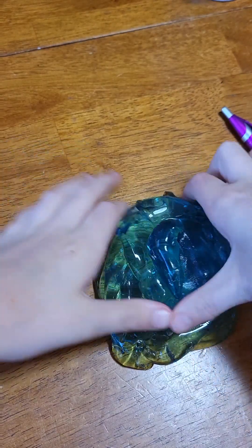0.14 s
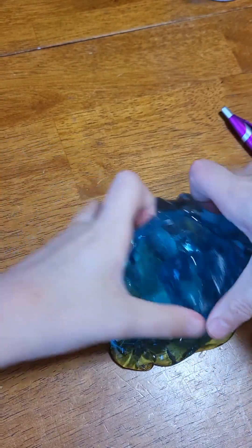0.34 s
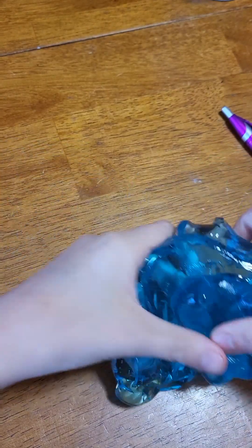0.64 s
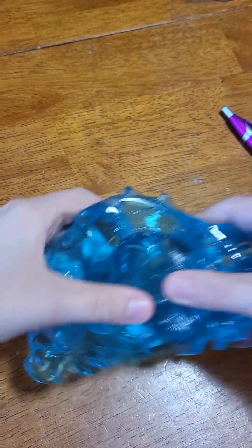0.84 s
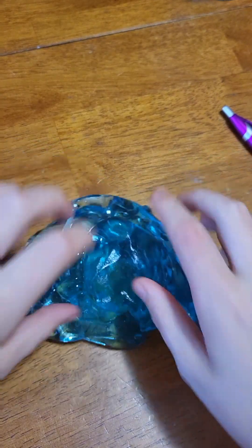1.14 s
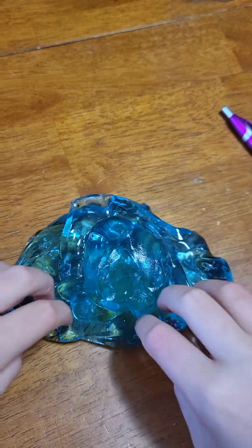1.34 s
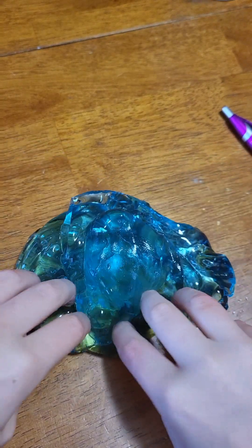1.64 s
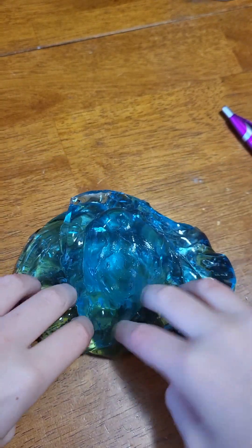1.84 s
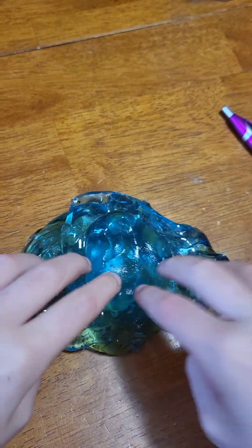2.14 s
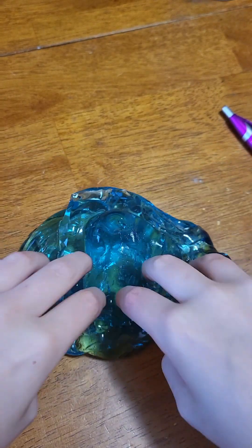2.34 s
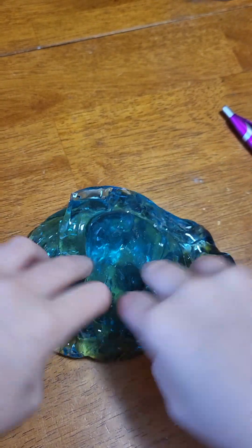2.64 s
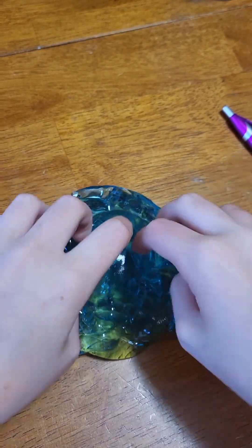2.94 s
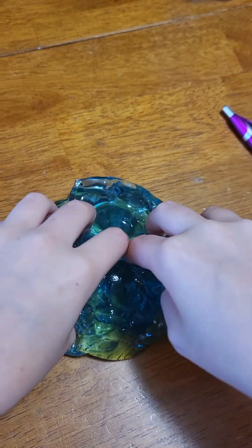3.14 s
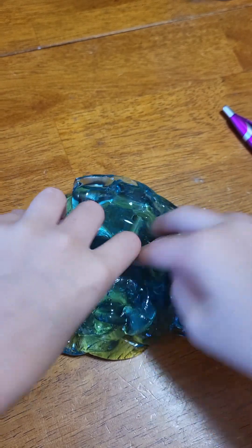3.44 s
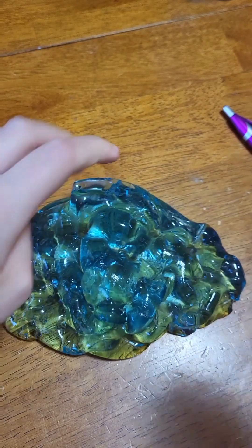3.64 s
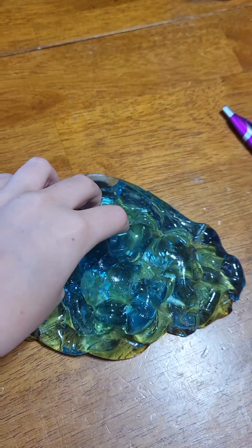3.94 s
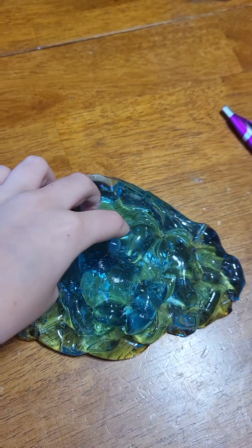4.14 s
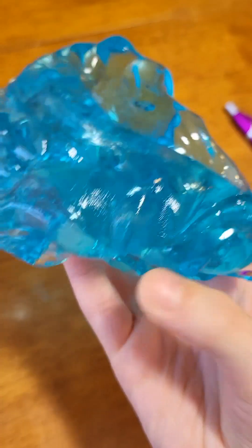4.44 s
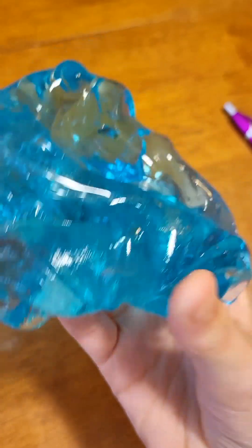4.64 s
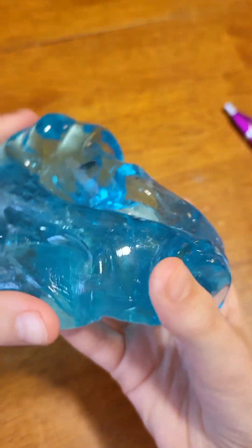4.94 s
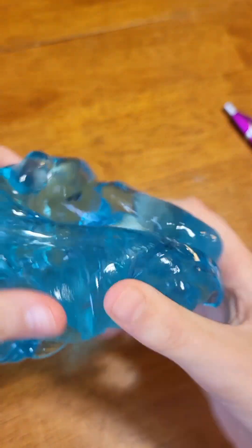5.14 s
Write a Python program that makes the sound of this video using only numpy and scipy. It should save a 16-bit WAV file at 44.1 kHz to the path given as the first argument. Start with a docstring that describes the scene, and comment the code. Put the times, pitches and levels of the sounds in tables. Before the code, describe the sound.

Slime is pressed and poked beside a phone. Tacky peeling and small ticks open, with a soft low landing. After quiet gaps, trapped air bursts in loud, crisp, wet pops, each with a brief ringing room tail, brighter on the left. Soft puffs buffet the right microphone. Near the end comes an abrupt cut, a loud dull tap on the case and a last faint sticky crackle over rumble and hiss.

```python
"""A small, live room with a wooden table: fingers poke a lump of slime close to a phone. Trapped air tears out
in pops, bursts of filtered noise with film and cavity rings, echoed by a noise-built room. Sticky skin and
rubbing hands crackle in swelling grains of noise, and wavering low tones buffet the right microphone as puffs.
Damped notes with noise make the lump's thuds and the knocks on the phone; sine hum, rumble and hiss lie under."""
import sys
import numpy as np
from scipy import signal
from scipy.fft import rfft, irfft
from scipy.io import wavfile
from scipy.ndimage import uniform_filter1d

SR = 44100
rng = np.random.default_rng(int(sys.argv[2]) if len(sys.argv) > 2 else 0)


def wrap_up_sound(samples):
    """Save the sound to the file named by the first command line argument, as 16-bit audio."""
    columns = np.atleast_2d(samples).T
    # keep every value between -1 and 1, then stretch to whole-number steps
    tamed = np.clip(columns, -1, 1)
    steps = np.round(tamed * 32767).astype(np.int16)
    wavfile.write(sys.argv[1], SR, steps)


N = 233756
TIME = np.arange(N) / SR

# relative colour of a rupture in its low, middle and top range: (frequency [Hz], level [dB])
BODY_COLOUR = [(200, -19), (600, -26), (1300, 2), (2400, 9), (3400, 10), (5000, -22.5)]
CRACK_COLOUR = [(2200, -11.5), (3700, 5.5), (5200, 5), (6400, 6.5), (7400, 11.5), (8500, 0.5), (9700, -12),
                (12000, -34)]
SIZZLE_COLOUR = [(7500, -27.5), (9800, -15.5), (11500, -9.5), (13500, -3), (15200, -5), (17000, -12.5)]


def undb(db):
    """Decibels to gain."""
    return 10 ** (np.asarray(db) / 20)


def unit(x):
    """Scale to rms 1."""
    return x / np.sqrt(np.mean(x ** 2) + 1e-20)


def blow(x):
    """Scale to the energy of one millisecond at rms 1, so that short and long bursts compare."""
    return x * np.sqrt(SR / 1000 / (np.sum(x ** 2) + 1e-20))


def on_log(hz, points):
    """Read (Hz, value) points on a log-frequency axis."""
    f, value = np.transpose(points)
    return np.interp(np.log(hz + 1e-3), np.log(f), value)


def colour(x, points):
    """Filter by a (Hz, dB) spectrum, leaving the phases alone."""
    size = x.shape[-1]
    gain = undb(on_log(np.fft.rfftfreq(size, 1 / SR), points))
    return irfft(rfft(x) * gain, size)


def strike(x, points, size=512):
    """Causal minimum-phase filter with a (Hz, dB) spectrum, so that attacks stay sharp."""
    gain = undb(on_log(np.fft.rfftfreq(size, 1 / SR), points))
    # folding the cepstrum onto positive times makes the filter minimum phase
    cepstrum = irfft(np.log(gain))
    cepstrum[1:size // 2] *= 2
    cepstrum[size // 2 + 1:] = 0
    impulse = irfft(np.exp(rfft(cepstrum)))
    return signal.fftconvolve(x, impulse)[:len(x)]


def ring(x, hz, q):
    """One damped resonance."""
    return signal.lfilter(*signal.iirpeak(hz, q, fs=SR), x)


def grains(size, spread_db):
    """Countless tiny ruptures of very unequal strength: noise whose level jumps at every sample."""
    return rng.standard_normal(size) * undb(spread_db * rng.standard_normal(size))


def add(out, s, sound):
    """Mix a sound in at a time."""
    i = int(s * SR)
    out[..., i:i + sound.shape[-1]] += sound[..., :N - i]


def pop(length, body_db, sizzle_db, film_db, size=2048):
    """The film over a pocket tears in a run of ruptures and rings along."""
    t = np.arange(size) / SR
    # the tear opens, runs for its length and dies; the table and hands scatter a little more
    opening = np.minimum(t / (0.0002 + 0.15 * length), 1)
    run = np.exp(-np.maximum(t - length, 0) / .00043)
    scatter = undb(-11) * np.exp(-t / 0.0065)
    tearing = opening * (run + scatter)
    # the slack film goes on crackling as it settles
    crackle = np.clip(unit(grains(size, spread_db=9.5)), -9, 9)
    settling = crackle * opening * np.exp(-t / 0.013)
    tear = unit(grains(size, spread_db=5.5)) * tearing + undb(-11.5) * settling
    ranges = ((BODY_COLOUR, body_db), (CRACK_COLOUR, 0), (SIZZLE_COLOUR, sizzle_db))
    snap = sum(undb(db) * blow(strike(tear, points, size=256)) for points, db in ranges)
    # the taut film rings on the same note in every pop
    film = ring(grains(size, spread_db=7.0) * tearing, hz=7530, q=14)
    return blow(snap + undb(film_db) * blow(film))


def pops(count=2):
    """A ragged tear sends a different wave in each direction: one row per direction."""
    # air pockets bursting, a few to each poke; the last three columns are relative to the crack:
    # (time [s], length [s], strength over 1 ms [dB], body [dB], sizzle [dB], film ring [dB])
    bursts = [(0.33, .002, -33.5, -6.5, 3, 2), (0.353, 0.0036, -23, 3, 23, -15),
              (0.371, 0.002, -26, 0.5, 7.5, -19), (0.425, 0.0033, -33, -9.5, -26, -28),
              (1.9192, 0.0062, -27, 7.5, -2, -19), (1.927, 0.0079, -13, -0.5, 3.5, -1),
              (1.942, 0.019, -21.5, -1, -12, -19), (1.9599, 0.00035, -13.5, -11, 0, -24),
              (1.962, 0.0033, -11.5, 1, 7, -9), (2.709, 0.0068, -17.5, -7, 6.5, -8),
              (2.7208, 0.0031, -13, -3, 4.5, -5.5), (2.738, 0.0022, -19.5, -13, 8.5, -13.5),
              (2.766, 0.00041, -18.5, -9.5, 8, -14.5), (2.7682, 0.0012, -9.5, -5.5, 12.5, -12),
              (2.7695, 0.0052, -14, -2.5, 0.5, 0), (3.499, .0033, -6.5, -10, -0.5, 7.5),
              (3.5727, 0.0054, -12.5, -5, 0, -13), (3.596, 0.009, -21, -28, 8, -10),
              (3.609, 0.0073, -13.5, -35, 1, -16), (4.292, 0.00043, -17.5, -13, 18, 10),
              (4.2939, 0.0052, -18, 0, 9.5, -8), (4.327, 0.0042, -15.5, -16.5, 5.5, 3),
              (4.3389, 0.0088, -8.5, -12, 4.5, 0.5)]
    out = np.zeros((count, N))
    for s, length, db, body_db, sizzle_db, film_db in bursts:
        for direction in out:
            add(direction, s, undb(db) * pop(length, body_db, sizzle_db, film_db))
    return out


def cavities():
    """An opening air cavity grows, so its note sinks a little as it dies."""
    # cavities under the fingertips, ringing as they are squeezed open:
    # (time [s], level before decay [dB], starting pitch [Hz], time to fall 60 dB [s])
    openings = [(0.425, -26, 5750, .004), (1.921, -22, 1650, .009), (1.964, -18.5, 1600, .012),
                (1.966, -29, 850, .016), (2.72, -23, 2400, .01), (2.771, -15.5, 1360, .015),
                (3.503, -25, 1190, .016), (3.576, -18, 2330, .009)]
    out, t = np.zeros(N), np.arange(4096) / SR
    for s, db, hz, t60 in openings:
        pitch = hz * (1 - .08 * (1 - np.exp(-t / .012)))
        swell = np.minimum(t / 0.0011, 1) * undb(db - 60 * t / t60)
        add(out, s, swell * np.sin(2 * np.pi * np.cumsum(pitch) / SR))
    return out


def microphones(waves):
    """The left microphone faces the slime; the right one hears it later and duller, mostly off the table."""
    glancing = strike(waves[1], [(500, -8.0), (2000, -1.5), (4500, -3.5), (8000, -8), (15000, -5.5)])
    # delays in samples
    right = undb(-20) * np.roll(waves[0], 4) + np.roll(glancing, 10)
    return np.array([waves[0], right])


def peeling():
    """Tacky skin pulls at the slime and lets go, and hands rub and rustle: a fine crackle that swells and dies,
    with a few lone ticks."""
    # skin peeling off, and hands rubbing and rustling: (time it lets go [s], build-up [s], relative strength
    # [dB], crackle against sizzle [dB])
    peels = [(0.16, .05, -59.5, -13), (0.28, 0.17, -53, -11.5), (0.36, 0.14, -46.5, -7.5),
             (0.60, 0.33, -62.5, -8.5), (0.88, 0.34, -66, -20), (1.02, 0.36, -63, -6.5),
             (1.10, 0.065, -56.5, -5), (1.16, .1, -79, 4), (1.60, 0.35, -70, 2), (1.7, 0.24, -69, -11),
             (2.405, 0.12, -62, -2), (3.49, 0.15, -58, -9), (5.16, .15, -54, -7), (5.28, 0.38, -73.5, 2)]
    # single sticky ticks: (time [s], strength over 1 ms [dB])
    ticks = [(.137, -51), (0.27, -48.5), (0.318, -41), (0.34, -32.5), (0.833, -56), (1.017, -56),
             (1.032, -49), (1.319, -54.5), (1.578, -53), (3.052, -60), (4.008, -62)]
    # a peel swells by the range as it builds, and loses it again over the release
    range_db, release_s = 37, 0.31
    out, sizzle, crackle = np.zeros((2, N)), 0, 0
    for s, build_s, db, crackle_db in peels:
        away = np.maximum((s - TIME) / build_s, (TIME - s) / release_s)
        pull = undb(db - range_db * away)
        sizzle = np.hypot(sizzle, pull)
        crackle = np.hypot(crackle, undb(crackle_db) * pull)
    # the soft body of the slime sounds along with the crackle
    layers = ((sizzle, -1.5, SIZZLE_COLOUR), (crackle, -0.5, CRACK_COLOUR), (crackle, -5, BODY_COLOUR))
    for level, db, points in layers:
        out += undb(db) * level * unit(colour(grains((2, N), spread_db=7.0), points))
    for s, db in ticks:
        for channel in out:
            add(channel, s, undb(db) * pop(length=0.00051, body_db=-9.5, sizzle_db=1.5, film_db=-10))
    return out


def puffs(size=16384):
    """Each puff is an eddy that shakes the membrane of the right microphone at a wandering rate, holds and dies."""
    # air striking the microphone: (time [s], level [dB], middle of the wandering rate [Hz], hold [s])
    gusts = [(1.97, -19, 74.3, 0.039), (2.732, -18, 63.5, 0.017), (2.768, -9, 107, 0.0046),
             (2.794, -22.5, 82.5, 0.012), (2.834, -19, 91.6, 0.028), (4.35, -30.5, 62.9, 0.048),
             (4.417, -31, 132.4, 0.016)]
    turbulence_colour = [(25, -10), (60, 8), (250, -14.5), (600, -34.5), (1500, -42), (5000, -45.0)]
    attack_s = 0.0016
    out, t = np.zeros(N), np.arange(size) / SR
    for s, db, hz, hold in gusts:
        wander = unit(uniform_filter1d(rng.standard_normal(size), 200))
        phase = 2 * np.pi * np.cumsum(hz * np.exp(0.3 * wander)) / SR
        # the time constant of the release equals the hold
        swell = np.minimum(t / attack_s, 1) * np.exp(-np.maximum(t - hold, 0) / hold)
        # the pressure crests are peaked, the troughs round; a slower push lies under them
        pressure = np.sin(phase) - 0.55 * np.cos(2 * phase) + 0.5 * np.sin(.68 * phase)
        turbulence = unit(colour(rng.standard_normal(size), turbulence_colour))
        eddy = unit(swell * (pressure + undb(-4.0) * turbulence))
        add(out, s, undb(db) * eddy * np.sqrt(np.mean(swell ** 2)))
    # the left microphone catches only a trace
    return np.outer([undb(-25.5), 1], out)


def thuds():
    """Soft weight on wood: a damped low note and a dull slap of resonant noise."""
    # lump and fingers landing: (time [s], relative level before decay [dB], pitch [Hz], time to fall 60 dB [s])
    landings = [(0.344, -33, 255, 0.42), (0.363, -21, 109, 0.14), (0.377, -29.5, 192, 0.06),
                (1.1, -35.5, 122.4, 0.68), (1.964, -30, 254, 0.11), (2.39, -38, 428, 0.24),
                (2.77, -25, 268, 0.11), (3.502, -41, 325, .15)]
    out, t = np.zeros((2, N)), np.arange(8192) / SR
    for s, db, hz, t60 in landings:
        slap_hz = hz * 1.1
        noises = rng.standard_normal((2, len(t)))
        slap = np.array([unit(ring(ring(noise, slap_hz, q=.8), slap_hz, q=.8)) for noise in noises])
        push = np.minimum(t / 0.0019, 1) * undb(db - 60 * t / t60)
        add(out, s, push * (0.47 * np.sin(2 * np.pi * hz * t) + 0.41 * slap))
    return out


def knocks():
    """Taps travel through the phone's case, a damped note and a bright tick, with no room on them."""
    # taps beside the right microphone:
    # (time [s], peak of the case note [dB], pitch [Hz], time to fall 60 dB [s], tick against case [dB])
    taps = [(4.414, -28, 2210, .002, 0), (4.4198, -4.5, 1730, 0.0034, -30),
            (4.4219, -17, 1440, 0.0073, -9.5), (4.492, -33.5, 1400, 0.0061, -18),
            (4.5697, -24, 1480, 0.0035, 0.5)]
    tick_colour = [(1000, -17), (4000, -14), (8000, 11), (14000, 6), (15500, 16), (17000, -27)]
    out, t = np.zeros(N), np.arange(1024) / SR
    for s, db, hz, t60, tick_db in taps:
        attack = np.minimum(t / 0.000227, 1) ** 2
        case = -np.sin(2 * np.pi * hz * t) * attack * undb(-60 * t / t60)
        contact = rng.standard_normal(len(t)) * np.minimum(t / 0.0001, 1) * np.exp(-t / 0.001)
        tick = strike(contact, tick_colour)
        add(out, s, undb(db) * case / np.abs(case).max())
        add(out, s + .0001, undb(db + tick_db) * tick / np.abs(tick).max())
    # the left microphone catches only a trace
    return np.outer([undb(-34), 1], out)


def room(x, size=32768):
    """Hard walls: sparse first reflections thicken into a tail whose top treble dies first."""
    # colour of the room's answer: (frequency [Hz], level [dB])
    answer = [(100, -11.5), (400, 12), (600, -0.5), (830, 3.5), (1300, -0.5), (2500, -4.5), (4500, -6),
              (7400, -8.5), (10000, -6.5), (15000, -3.5)]
    # its decay: (frequency [Hz], time to fall 60 dB [s])
    decay = [(150, 0.61), (1200, 0.42), (3000, 0.37), (7000, 0.49), (11000, 0.16), (15000, 0.1)]
    t, hz = np.arange(size) / SR, np.fft.rfftfreq(size, 1 / SR)
    centres = np.geomspace(250, 16000, 7)
    # share of samples that carry an echo
    density = np.clip((t / 0.048) ** 2, .04, 1)
    echoes = rng.standard_normal((2, size)) * (rng.random((2, size)) < density) / np.sqrt(density)
    # nothing returns in the first 3 ms; the early echoes are stronger
    spectrum = rfft(echoes * (t > .003) * (1 + 1.7 * np.exp(-t / 0.01)))
    tails = 0
    # overlapping bands, each with its own decay
    for centre, share in zip(centres, np.eye(len(centres))):
        band = irfft(spectrum * np.interp(hz, centres, share), size)
        tails = tails + band * np.exp(-np.log(1000) * t / on_log(centre, decay))
    tails = np.array([strike(tail / np.sqrt(np.sum(tail ** 2)), answer) for tail in tails])
    return signal.fftconvolve(x[None], tails, axes=1)[:, :N]


def background():
    """A wavering appliance hum over a rumble that both microphones largely share, and each one's own hiss."""
    # appliance hum: (frequency [Hz], relative level [dB])
    hum_tones = [(59.2, -58.5), (215.3, -51), (452.2, -62.5)]
    # colour of the steady room rumble: (frequency [Hz], relative density [dB per Hz])
    rumble_colour = [(15, -45.5), (25, -11.5), (59, -12), (86, -12.5), (123, -7), (188, -13.5), (220, 1.5),
                     (251, -8), (298, -12.5), (321, -22.5), (461, -20.5), (800, -34), (1040, -67),
                     (1760, -120)]
    # colour of the faint hiss at each microphone: (frequency [Hz], relative density [dB per Hz])
    left_hiss = [(300, -2), (700, 1.5), (1100, 2), (1900, -1), (2400, -11.5), (3200, -17.5), (7600, -21),
                 (8800, -32.5), (11000, -26.5), (13500, -19), (15500, -26.5)]
    right_hiss = [(300, -18.5), (650, 4), (1100, -6), (1600, 0.5), (3050, -4.5), (3600, -19.5), (5500, -23),
                  (7700, -15.5), (8800, -22), (11000, -23.5), (14000, -19.5)]
    waver_colour = [(3, -13.5), (14, -9.5), (40, -23.0), (150, -86.5)]
    noise = rng.standard_normal(N) + 0.25 * rng.standard_normal((2, N))
    rumble = undb(-44.0) * unit(colour(noise, rumble_colour))
    hiss = [undb(db) * unit(colour(rng.standard_normal(N), points))
            for points, db in ((left_hiss, -60.5), (right_hiss, -59.5))]
    hum = 0
    for hz, db in hum_tones:
        waver = unit(colour(rng.standard_normal(N), waver_colour))
        tone = np.sin(2 * np.pi * (hz * TIME + rng.random()))
        hum = hum + undb(db) * (1 + 0.44 * waver) * tone
    # rumble and hum lean to the left
    return (rumble + hum) * undb([[1], [-1]]) + np.array(hiss)


def scene():
    """Slime sounds and their room, with thuds, puffs, knocks and background on top."""
    waves, peel = pops() + cavities(), peeling()
    # each direction finds its own way round the walls
    walls = sum(room(wave + peel[k % 2]) for k, wave in enumerate(waves)) / np.sqrt(len(waves))
    # a cut stops the room tail dead just before the knocks; the room is heard again after them
    cut_from_s, cut_to_s = 4.403, 5.07
    tail_gate = uniform_filter1d(1. * ((TIME < cut_from_s) | (TIME > cut_to_s)), size=64)
    return microphones(waves) + peel + tail_gate * walls + thuds() + puffs() + knocks() + background()


def record(dry):
    """The phone cuts the deepest bass and the top of the treble."""
    no_sub = signal.sosfilt(signal.butter(4, 36, "high", fs=SR, output="sos"), dry)
    # steep low-pass at 15.7 kHz: 0.2 dB ripple, 70 dB rejection
    return signal.sosfilt(signal.ellip(8, .2, 70, 15700, fs=SR, output="sos"), no_sub)


dry = scene()
out = record(dry)
wrap_up_sound(out)
```